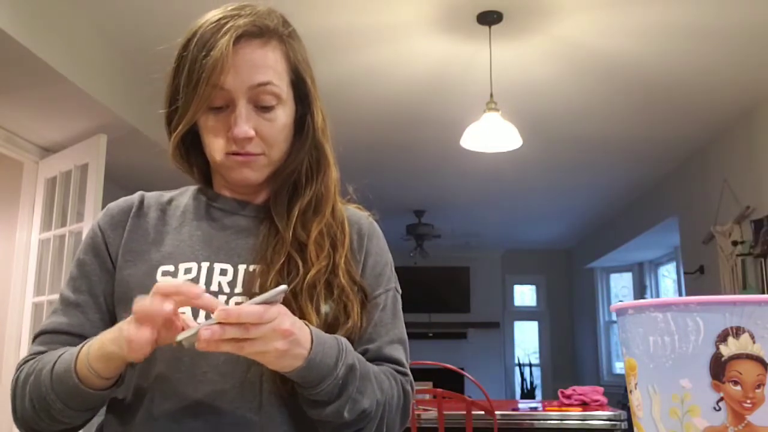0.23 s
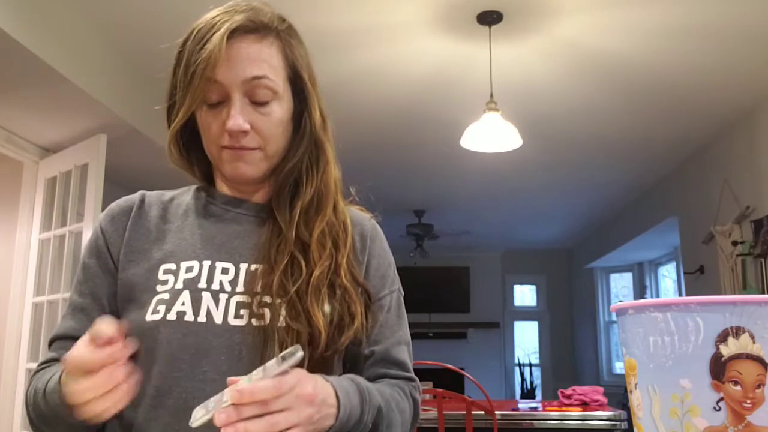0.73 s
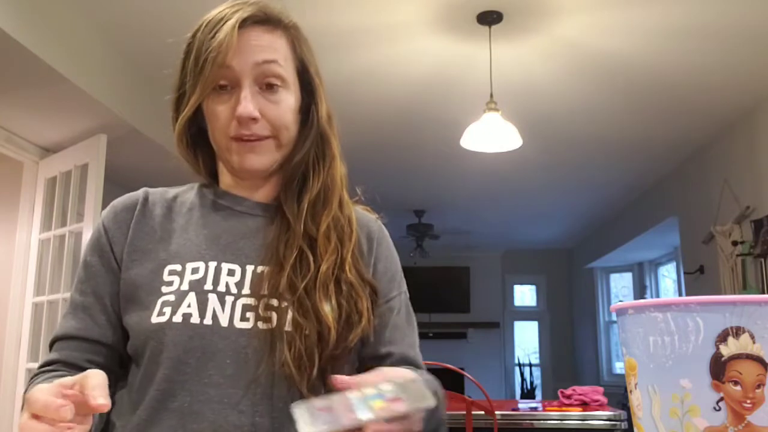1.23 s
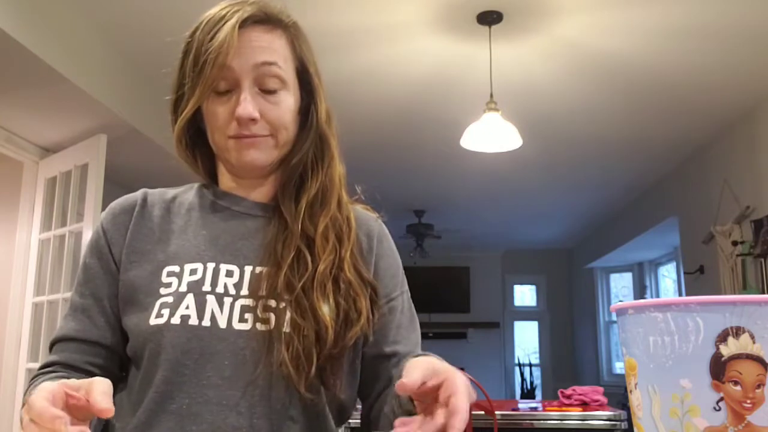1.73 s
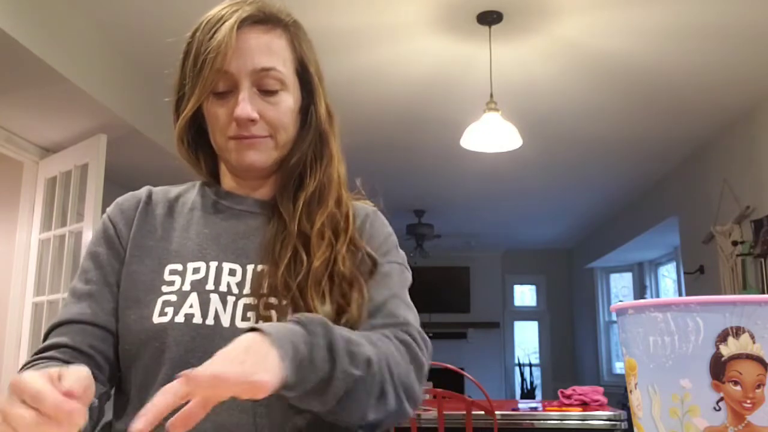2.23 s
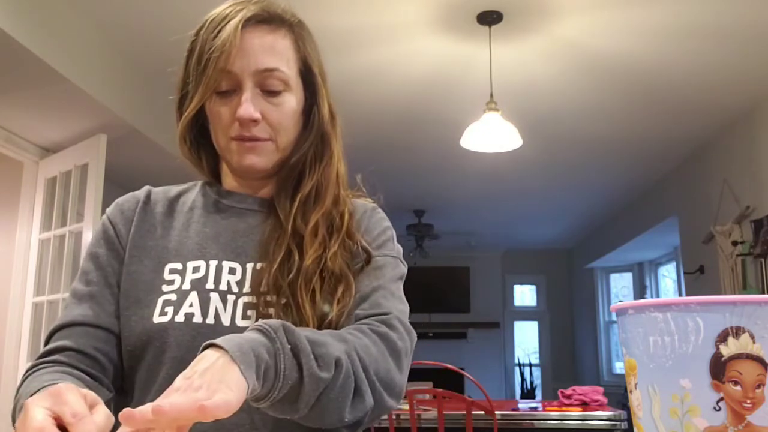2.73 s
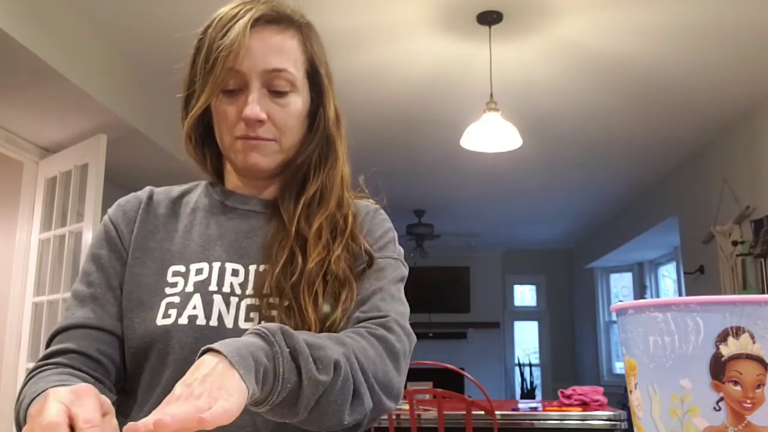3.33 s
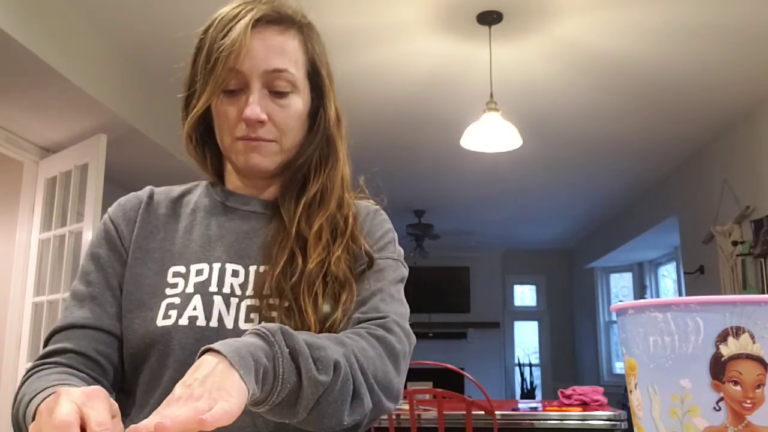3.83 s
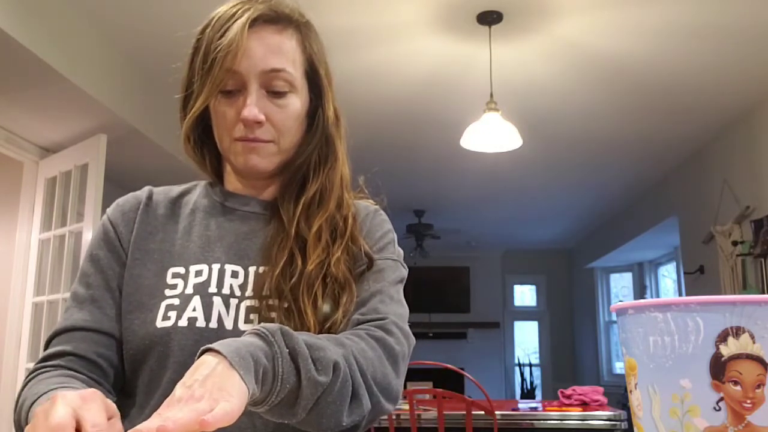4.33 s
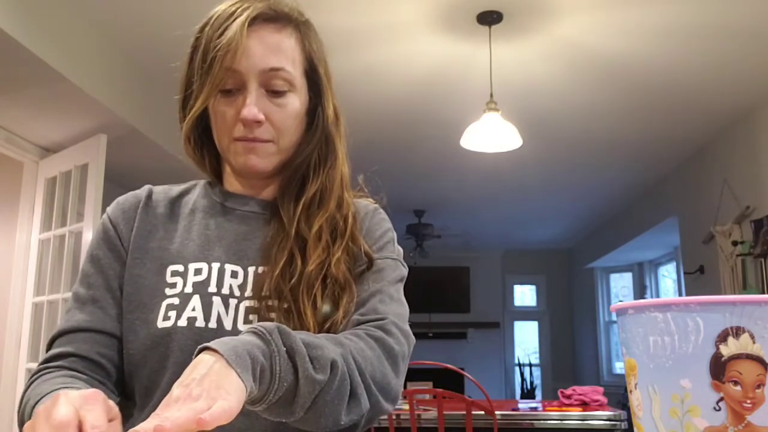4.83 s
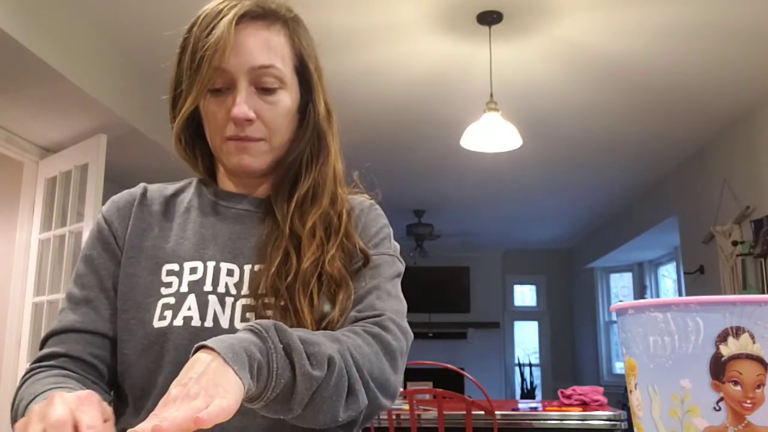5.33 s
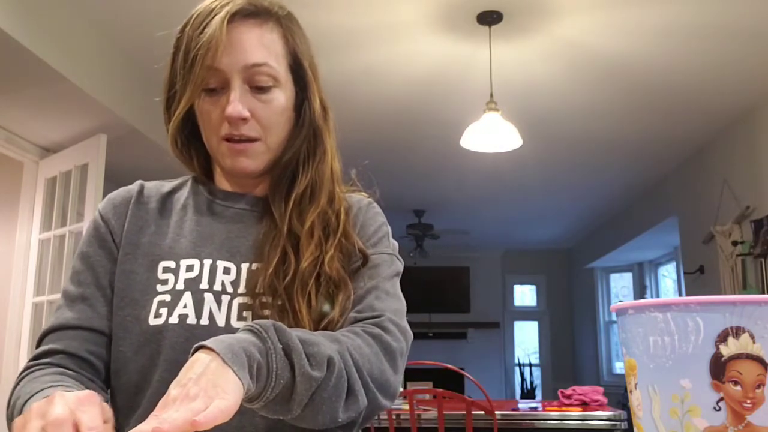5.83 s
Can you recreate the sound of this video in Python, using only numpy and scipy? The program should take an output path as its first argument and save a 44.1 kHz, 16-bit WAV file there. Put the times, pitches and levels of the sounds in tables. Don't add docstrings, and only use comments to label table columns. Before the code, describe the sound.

After faint ticks and a sleeve brush, hard plastic clacks and rattles on a table very close by, calms, then knocks again softly in a humming kitchen.

```python
import sys
import numpy as np
from scipy import signal
from scipy.fft import rfft, irfft, next_fast_len
from scipy.io import wavfile
from scipy.ndimage import uniform_filter1d, map_coordinates

SR = 44100
rng = np.random.default_rng(int(sys.argv[2]) if len(sys.argv) > 2 else 0)


def voltage_ratio(decibels):
    exponent = np.asarray(decibels, float) / 20
    return 10 ** exponent


def master_out(mix):
    frames = np.transpose(np.atleast_2d(mix))
    ceiling = np.clip(frames, -1, 1)
    pcm = np.round(ceiling * 32767).astype(np.int16)
    wavfile.write(sys.argv[1], SR, pcm)


N = 268613


def unit(x):
    return x / np.sqrt(np.mean(x ** 2) + 1e-20)


def along(points, hz):
    f, v = np.transpose(points)
    return np.interp(np.log(hz + 1), np.log(f + 1), v)


def wobble(rate):
    knots = rng.standard_normal(int(N * rate / SR) + 4)
    return map_coordinates(knots, [np.arange(N) * rate / SR])


def filtered(x, response):
    m = next_fast_len(x.shape[-1] + SR // 2)
    spectrum = rfft(x, m) * response(np.fft.rfftfreq(m, 1 / SR))
    return irfft(spectrum, m)[..., :x.shape[-1]]


def coloured(x, spectrum):
    return filtered(x, lambda hz: unit(voltage_ratio(along(spectrum, hz))))


def resonant(x, modes, order=1):
    def response(f):
        total = 0
        for k, (centre, width, db) in enumerate(modes):
            damping = 1j * f * width
            total = total + (-1) ** k * voltage_ratio(db) * damping / (centre * centre - f * f + damping)
        g = total ** order
        return g / np.sqrt(np.mean(abs(g) ** 2))
    return filtered(x, response)


def patchy(depth_db):
    z = signal.stft(rng.standard_normal((2, N)), nperseg=512)[2]
    field = uniform_filter1d(rng.standard_normal(z.shape[1:]), size=8, axis=0)
    field = uniform_filter1d(field, size=8, axis=1)
    return unit(signal.istft(z * voltage_ratio(depth_db * unit(field)), nperseg=512)[1][:, :N])


def strokes(rows, rise, fall):
    t = np.arange(0, N / SR + .001, .001)
    gain = 0
    for s, held, db in rows:
        early = np.clip(s - t, 0, None)
        late = np.clip(t - s - held, 0, None)
        gain = gain + voltage_ratio(db - rise * early - fall * late)
    return np.interp(np.arange(N) / SR, t, gain)


def ports(pair, alike, lean, lag_s):
    def response(hz):
        same = np.clip(along(alike, hz), 0, 1)
        half_lean = along(lean, hz) / 2
        far = voltage_ratio(-half_lean) * np.exp(-2j * np.pi * hz * lag_s)
        return np.array([voltage_ratio(half_lean), far * same, far * np.sqrt(1 - same ** 2)])
    left, shared, own = filtered(pair[[0, 0, 1]], response)
    return np.array([left, shared + own])


# (frequency [Hz], density [dB per Hz])
RUMBLE = [(15, -58), (25, -34.5), (98, -6), (139, -8.5), (206, -7), (224, -16), (280, -13.5), (388, -17),
          (493, -25.5), (595, -26), (1500, -46.5), (1950, -73.5), (3300, -120)]
# (frequency [Hz], width [Hz], level [dB])
MOTOR = [(131.23, 1.94, 3.5), (267, 30, -9.5)]
# (time [s], level [dB])
RUMBLE_DB = [(0.0, -67), (1.47, -65.5), (1.95, -55), (2.1, -65), (3.441, -67), (6.09, -64.5)]
# (frequency [Hz], density [dB per Hz])
HISS = [(900, -37.5), (1400, -6.5), (3000, -6.5), (6200, -11.5), (7400, -0.5), (8300, -10.5), (10500, -10),
        (12200, -3), (15700, -2)]
HISS_DB = -83
# (frequency [Hz], left-right likeness)
ROOM_ALIKE = [(60, 1), (180, 0.68), (550, 0.27), (1650, 0.36), (4970, 0.091), (15000, -0.14)]
# (frequency [Hz], left minus right [dB])
ROOM_LEAN = [(60, 7), (180, 5), (550, 4), (1650, 2.5), (4970, 7), (15000, 1.5)]


def room_tone():
    air = patchy(depth_db=1.7)
    drone = unit(resonant(rng.standard_normal((2, N)), MOTOR))
    rumble = unit(coloured(air, RUMBLE)) + voltage_ratio(-1.5) * drone
    level_db = np.interp(np.arange(N) / SR, *np.transpose(RUMBLE_DB))
    rumble *= voltage_ratio(level_db + 1.5 + 0.82 * wobble(3.6))
    hiss = voltage_ratio(HISS_DB + 7.5 + 1.4 * wobble(1.5)) * unit(coloured(air, HISS))
    return ports(rumble + hiss, ROOM_ALIKE, ROOM_LEAN, lag_s=0.00019)


# (start [s], held [s], level [dB])
CREAK = [
    (.5, 0.031, -67),
    (4.72, 0.32, -57.5),
    (4.93, 0.032, -77),
    (5.1, 0.076, -72),
    (5.85, 0.17, -65),
]
# (start [s], held [s], level [dB])
LEAN = [(.505, 0.019, -71.5), (.774, 0.0046, -70.5), (.985, 0.0054, -56), (1.29, 0.0082, -60.5),
        (1.34, 0.026, -58), (1.6, 0.055, -54), (1.92, 0.0045, -45), (2.17, .03, -59), (2.245, .02, -60),
        (2.36, 0.019, -63), (2.64, 0.327, -65), (4.46, 0.18, -66), (4.7, 0.06, -50), (4.88, 0.0043, -43),
        (5.06, 0.004, -63.5), (5.33, .15, -66), (5.79, 0.093, -67.5), (6.05, 0.044, -70.5)]
# (frequency [Hz], width [Hz], level [dB])
DRONE = [(780, 60, 0), (893, 70, -4), (685.5, 50, -5), (487, 97, -5.5), (1060, 150, -8)]
# (frequency [Hz], width [Hz], level [dB])
FRAME = [(81.5, 18, -5.5), (106, 34, 0), (124, 16, 5.5), (228, 260, 6), (440, 300, -9)]
LEAN_RISE, LEAN_FALL = 350, 360
RUB_RISE, RUB_FALL = 190, 163


def leaning():
    push = rng.standard_normal((2, N))
    hum = unit(voltage_ratio(3.5 * wobble(30)) * resonant(push, DRONE, order=2))
    creak = unit(resonant(push[::-1], FRAME, order=2))
    return strokes(LEAN, LEAN_RISE, LEAN_FALL) * hum + strokes(CREAK, RUB_RISE, RUB_FALL) * creak


# (time [s], peak level [dB], case pitch [Hz], plate ring [dB], treble [dB])
EARLY = [
    (0.7094, -67, 1480, -27, -20),
    (1.1314, -66.5, 2140, -20, -21),
    (1.2546, -63, 4240, -1.5, 11),
    (3.4294, -65, 3394, -28.5, 15.5),
    (3.4444, -71, 3180, -26, 13),
    (3.6097, -80, 4920, -11, 16),
]
SET_DOWN = [
    (1.5343, -22, 1970, -25, -13),
    (1.5422, -36.5, 2080, -9.5, -19.5),
    (1.575, -22, 2100, -19.5, -24),
    (1.5956, -27.5, 2040, -22.5, -40.5),
    (1.8359, -11.5, 1701, -20.5, -0.5),
    (1.848, -18.5, 2150, -25, 1.5),
    (1.874, -22, 2150, -14.5, 0),
    (1.9022, -20, 1694, -22, -5.5),
    (1.92, -26.5, 2940, -11.5, -12),
    (2.1021, -32, 3850, -6, -17.5),
]
SHUFFLE = [(1.766, -29, 1930, -20, -15.5), (2.0207, -41.5, 4000, -14, 8), (2.067, -28.5, 2350, -12, -14),
           (2.1639, -39, 2330, -16, 2.5), (2.5144, -37, 1760, -3.5, -1.4), (2.6375, -27, 2370, 2.5, -3.5),
           (2.6419, -27.5, 2480, 4, -20), (2.6606, -46, 2500, 10, -21), (2.6894, -20, 1870, -5.5, -12),
           (2.7353, -25.5, 3690, -16, -5.5), (2.76, -47.5, 4530, -10, 3), (2.8105, -48.5, 2340, 1, -15),
           (2.9112, -54.5, 2340, 8, 5.5), (3.0086, -63, 3230, -3.5, -4), (3.146, -48.5, 2335, -7, -1)]
CLICKS = [(2.152, -37, 2400, -10, -9.5), (2.3499, -35, 3850, -17.5, -4.5), (2.368, -30.5, 1994, -27, -10.5),
          (2.4309, -21, 2960, -3, -9.5), (2.623, -38, 3670, -23.5, -15.5), (2.6973, -22, 2580, 1.5, -8),
          (2.7147, -34.5, 2290, 3, -8), (2.787, -31, 2190, -10, -33.5), (2.8603, -36.5, 3730, -12.5, -2.5),
          (2.9458, -47.5, 2330, -9, 0), (2.9842, -47, 1410, 0, -4), (4.9694, -49.5, 4460, -6, -6),
          (5.4335, -55, 2240, -14, 0.5), (5.7597, -51.5, 1610, -14.5, -32)]
LATE = [
    (4.4523, -51.5, 2690, -6, -2),
    (4.7104, -44.5, 4100, -1, -8),
    (4.7551, -45, 2900, -7, -1),
    (4.7716, -45, 2820, -6, 0.5),
    (4.8621, -27.5, 3250, -4, -18),
    (4.91, -55.5, 1490, -20, 7),
    (5.2594, -69, 1700, 6.5, 4),
    (5.4174, -56, 2230, -21, 6),
]
DROPS = [
    (1.7495, -17, 2150, -9, -13.5),
    (1.9949, -22, 3397, -16, -3),
    (2.5075, -35.5, 2280, 0, 0),
]
AT_RIM = [
    (2.0853, -19, 3620, -5.5, -5),
    (2.406, -9, 2760, -11.5, -16.5),
    (2.4216, -33, 2500, -8, -14),
    (4.6528, -40, 2670, -7.5, -2),
    (4.6922, -49, 2930, 2, -13),
    (4.8499, -21, 4820, -1, -13.5),
]
THUMP_DB = {"tick": -22, "palette": -20.5, "flat": -6, "edge": -22.5, "nudge": -4.5, "drop": -5.5, "rim":
            -20}
THUMP_GROWS, MIDDLING_DB = 0.98, -34
# (pitch ratio, level [dB], t60 [s])
CASE = [(1.001, 0.5, 0.094), (1.19, -14.5, 0.021), (1.518, -17, 0.014), (1.901, -5, .012),
        (.72, 15, 0.0073), (2.598, -10.5, 0.014)]
# (frequency [Hz], level [dB])
CRACK = [(700, -46.5), (1200, -1), (2200, -4.5), (3200, -4.5), (4500, -3.5), (7000, -14), (10000, -26)]
# (frequency [Hz], level [dB])
SPARK = [
    [(3500, -39), (5000, -10), (7200, 1.5), (9500, -2), (12000, 0), (15500, 1)],
    [(1800, -29.5), (3500, -9.5), (5000, -0.5), (7200, 0.5), (9500, -9.5), (12000, -9), (15500, -15)],
]
# (frequency [Hz], width [Hz], level [dB])
TRAY = [(266.6, 10, -1), (492, 15, -3), (689, 27, 0.5), (958, 50, 0.5), (1080, 180, -10)]
# (frequency [Hz], width [Hz], level [dB])
TOP = [(748, 100, 11), (668.4, 16, 2.5), (736, 26, 3), (740, 44, -6), (930, 25, 0), (930, 23, 5),
       (960, 140, 1.5), (403, 76, -17)]
# (frequency [Hz], width [Hz], level [dB])
RIM = [(839, 60, 1.5), (870, 25, -15), (737, 36, -10), (460, 74, -22), (1040, 60, -14.5), (1410, 100, -19)]


def contacts():
    crack, case, frame, tray, top, rim, hard, soft = np.zeros((8, 2, N + SR))
    t = np.arange(SR // 9) / SR
    # (plate struck, edge, give [s], share of ring time)
    in_hand = (tray, hard, .000005, 1)
    on_top = (top, soft, .00002, .55)
    on_rim = (rim, soft, .00002, .55)
    kinds = [("tick", EARLY, in_hand), ("palette", SET_DOWN, in_hand), ("flat", SHUFFLE, on_top),
             ("edge", CLICKS, on_top), ("nudge", LATE, on_rim), ("drop", DROPS, on_rim), ("rim", AT_RIM, on_rim)]
    for kind, events, (plate, spark, give_s, ring) in kinds:
        for s, db, hz, ring_db, treble_db in events:
            thump_db = MIDDLING_DB + THUMP_DB[kind] + THUMP_GROWS * (db - MIDDLING_DB)
            at = slice(round(s * SR), round(s * SR) + len(t))
            noise = rng.standard_normal((4, 2, len(t)))
            draw = rng.standard_normal((len(CASE), 2, 2, 1))
            gentle = np.clip(-12 - db, 1, 16)
            rise = 1 - np.exp(-t / (give_s * gentle))
            peak = signal.iirpeak(hz, 0.046 + 0.12 * gentle, SR)
            body = unit(signal.lfilter(*peak, signal.lfilter(*peak, noise[0])))

            crack_fall = voltage_ratio(-60 * t / 0.018) + voltage_ratio(-29.5 - 60 * t / 0.13)
            crack[:, at] += voltage_ratio(db - 9.5) * rise * crack_fall * body
            spark_fall = voltage_ratio(-60 * t / 0.011) + voltage_ratio(-28 - 60 * t / 0.13)
            spark[:, at] += voltage_ratio(db + treble_db + 2.5) * rise * spark_fall * noise[1]

            for (ratio, level_db, t60), (size, detune) in zip(CASE, draw):
                pitch = hz * ratio * (1 + 0.018 * detune[0])
                mode_db = db - 17.5 - 0.05 * gentle + level_db + 3.5 * size
                case[:, at] += voltage_ratio(mode_db - 60 * t / (ring * t60)) * rise * np.sin(2 * np.pi * pitch * t)

            plate[:, at] += voltage_ratio(db + ring_db + 8.0 - 60 * t / 0.0038) * (0.55 * noise[2] - 1)
            frame[:, at] += voltage_ratio(thump_db - 0.5 - 60 * t / 0.0023) * (2.0 * noise[3] - 1)

    edges = coloured(hard[:, :N], SPARK[0]) + coloured(soft[:, :N], SPARK[1])
    plastic = coloured(crack[:, :N], CRACK) + edges + case[:, :N]
    table = resonant(top[:, :N], TOP) + resonant(rim[:, :N], RIM) + resonant(frame[:, :N], FRAME)
    return plastic + voltage_ratio(3.0) * resonant(tray[:, :N], TRAY) + table


# (frequency [Hz], t60 [s])
KITCHEN = [(150, 0.32), (800, 0.45), (3000, .35), (8000, 0.083), (15000, 0.053)]


def kitchen(x):
    hz, t, z = signal.stft(rng.standard_normal((2, SR // 2)), SR, nperseg=256)
    fall = voltage_ratio(-60 * t / along(KITCHEN, hz)[:, None])
    tail = signal.istft(z * fall, SR, nperseg=256)[1]
    delayed = np.pad(x, (250, 0))[None]
    return signal.fftconvolve(delayed, tail / np.linalg.norm(tail[0]), axes=1)[:, :N]


# (start [s], held [s], level [dB])
SWISH = [
    (0.829, 0.15, -52.5),
    (1.265, 0.072, -65.5),
]
# (frequency [Hz], density [dB per Hz])
CLOTH = [
    [(590, -31), (1000, -12), (1150, -26), (1410, -3.5), (1610, -3), (2170, -4.5), (3140, -13.5),
     (4240, -4), (5990, -7.5), (7550, -2), (8570, -6), (12000, -4), (15800, -6)],
    [(590, -34), (1000, -13), (1700, -24), (2190, -1.5), (3140, -16), (3820, 4.5), (5040, -6), (5790, -3),
     (6350, -12), (7810, -8.5), (9510, -16), (12700, -14), (15800, -24)],
]
SWISH_RISE, SWISH_FALL = 330, 211


def sleeves():
    n = 2 * SR
    flutter = voltage_ratio(.6 * wobble(30) + 1.2 * wobble(670))
    fibres = (flutter * patchy(depth_db=1.2))[:, :n]
    brush = np.zeros((2, n))
    for row, colour in zip(SWISH, CLOTH):
        brush += strokes([row], SWISH_RISE, SWISH_FALL)[:n] * unit(coloured(fibres, colour))
    return np.pad(brush, ((0, 0), (0, N - n)))


# (start [s], held [s], level [dB], fall [dB/s])
CHATTER = [
    (1.541, .015, -42.5, 299.5),
    (1.58, 0.035, -51, 140.5),
    (1.757, .015, -48.5, 219.5),
    (1.857, 0.02, -29, 230),
]
TRAY_HUM = (1.8, 0.19, -42, 300)
# (frequency [Hz], width [Hz], level [dB])
PANS = [
    [(1100, 90, -13.5), (1490, 140, -2.5), (2120, 69, -12.5), (2540, 400, -8), (2940, 250, -9.5),
     (3852, 30, -28)],
    [(1964, 35, -10), (2150, 150, -1), (2950, 240, -4.5), (3820, 98, 0), (3750, 26, 0), (4477, 27.4, -4),
     (4530, 37, -8), (4930, 20, -9.5), (5970, 94, -13.5), (6683, 150, -19.5)],
    [(1311, 200, -6), (2150, 250, 1), (3500, 404, -4.5), (5220, 600, -6)],
]
# (frequency [Hz], width [Hz], level [dB])
SHELL = [
    [(2000, 720, -3)],
    [(3180, 4000, -12)],
    [(3500, 5000, 0)],
]
WHICH_PANS = (0, 0, 2, 1)
CHATTER_RISE = 3500


def pans():
    n = 5 * SR // 2
    clumps = voltage_ratio(2.6 * wobble(160) + 4.6 * wobble(700))
    knocks = (clumps * rng.standard_normal((2, N)))[:, SR:n]
    colours = [unit(resonant(knocks, modes) + resonant(knocks, shell)) for modes, shell in zip(PANS, SHELL)]
    bursts = [(burst, colours[k]) for burst, k in zip(CHATTER, WHICH_PANS)]
    bursts.append((TRAY_HUM, unit(resonant(knocks, TRAY[:3], order=2))))
    rattle = np.zeros_like(knocks)
    for (s, held, db, fall), colour in bursts:
        rattle += strokes([(s, held, db)], CHATTER_RISE, fall)[SR:n] * colour
    return np.pad(rattle, ((0, 0), (SR, N - n)))


# (start [s], held [s], level [dB], brightness [dB])
RUB = [(1.55, 0.011, -81, 11), (1.77, 0.043, -86, 8), (1.91, 0.021, -49, -11), (2.01, 0.039, -58.5, -1),
       (2.11, 0.061, -55.5, -9), (2.328, 0.045, -55.5, -6), (2.58, .04, -55.5, -3.5),
       (2.84, 0.029, -58, -5), (3.39, 0.31, -91, 9.5), (3.98, 0.12, -86.5, 3), (4.47, 0.034, -67, -3.5),
       (4.7, 0.17, -58, -9.5), (4.87, 0.079, -63.5, -5), (5.03, 0.22, -84, 18), (5.327, 0.074, -65.5, 1.5),
       (5.48, 0.13, -58, 4), (5.68, 0.029, -63.5, 7), (5.79, 0.12, -61, 3.5), (5.98, 0.15, -71, 8)]
# (frequency [Hz], density [dB per Hz])
SKIN = [(590, -39.5), (1000, 1), (1150, -5.5), (1580, 0.5), (1770, -3.5), (2200, -1.5), (3150, -6),
        (3570, -3), (4970, -0.5), (8500, -7), (11000, -36.5), (18700, -120)]
# (frequency [Hz], density [dB per Hz])
SHEEN = [(4410, -38), (7500, -3), (8110, -9), (10800, -2.5), (11700, -1.5), (15100, -1), (15800, -17)]
# (start [s], held [s], level [dB])
SING = [
    (2.966, 0.013, -59),
    (4.455, .19, -75.5),
    (4.68, .11, -66),
]
# (frequency [Hz], width [Hz], level [dB])
LID = [(2881, 160, 0)]
SING_RISE, SING_FALL = 810, 510


def rubbing():
    grip = voltage_ratio(.3 * wobble(30) + .6 * wobble(150) + 2.2 * wobble(700))
    dull = [(s, held, db) for s, held, db, bright_db in RUB]
    skin = strokes(dull, RUB_RISE, RUB_FALL) * unit(grip * coloured(patchy(depth_db=1.5), SKIN))
    bright = [(s, held, db + bright_db - 0.5) for s, held, db, bright_db in RUB]
    sheen = strokes(bright, RUB_RISE, RUB_FALL) * unit(grip * coloured(patchy(depth_db=-1.5), SHEEN))
    song = unit(grip * resonant(rng.standard_normal((2, N)), LID, order=2))
    return skin + sheen + strokes(SING, SING_RISE, SING_FALL) * song


# (start [s], held [s], level [dB], centre [Hz], sharpness)
SCUFF = [(2.1, 0.0093, -52, 4460, 0.66), (2.15, 0.025, -51.5, 5030, 0.62), (2.208, .004, -59, 3700, 0.88),
         (2.3, 0.016, -55.5, 3680, 1.5), (2.31, 0.016, -51, 6000, 1.1), (2.343, 0.0082, -42, 4230, 1.8),
         (2.393, 0.004, -51, 6500, 2.5), (2.624, 0.012, -43.5, 4180, 1.2), (2.685, .004, -44.5, 3500, 2.1),
         (2.715, 0.0037, -49, 7500, 3.5), (2.761, 0.0073, -43, 9000, 0.59),
         (2.792, .005, -45.5, 7000, 0.51), (2.74, 0.025, -51.5, 4000, .8), (2.813, .004, -59, 7500, 2),
         (2.85, 0.014, -42, 3470, 1.12), (2.451, .03, -58, 3500, 0.57), (2.55, 0.064, -55.5, 4400, 0.84),
         (4.49, 0.039, -67.5, 5700, 1.7), (4.786, 0.048, -65.5, 6230, 8), (4.905, 0.0091, -60, 7000, 1.5)]
SCUFF_RISE, SCUFF_FALL = 2700, 1000


def scuffs():
    out = np.zeros((2, N))
    lead = SR // 25
    for s, held, db, hz, sharp in SCUFF:
        at = slice(round(s * SR) - lead, round(s * SR) + SR // 6)
        gain = strokes([(s, held, db)], SCUFF_RISE, SCUFF_FALL)[at]
        noise = rng.standard_normal((3, len(gain)))
        grit = voltage_ratio(6 * unit(uniform_filter1d(noise[2], size=60))) * noise[:2]
        peak = signal.iirpeak(hz, max(sharp, .4), SR)
        out[:, at] += gain * unit(signal.lfilter(*peak, signal.lfilter(*peak, grit)))
    return out


# (frequency [Hz], level [dB])
LOW_CUT = [(25, -20), (40, -8), (70, -0.5)]
# (frequency [Hz], left minus right [dB])
NEAR_LEAN = [(40, 13), (125, 9.5), (300, 8.5), (700, 8.5), (1400, 11), (2800, 10.5), (5600, 10),
             (9000, 4.5), (14000, 5.5)]
# (frequency [Hz], level [dB])
AIRBORNE = [(100, 8), (500, 0), (1500, -3.5), (15000, 4.5)]
LAG_S = 0.0004584


def scene():
    room = room_tone()
    hits = filtered(contacts(), lambda hz: voltage_ratio(along(LOW_CUT, hz))) + pans()
    handling = hits + leaning() + sleeves() + rubbing() + scuffs()
    near_alike = [(200, 0.96), (1000, 0.93), (3000, 0.27), (12000, 0.06)]  # (frequency [Hz], likeness)
    near = ports(handling, near_alike, NEAR_LEAN, LAG_S)
    answer = voltage_ratio([[3.5], [-3.5]]) * kitchen(coloured(hits[0], AIRBORNE))
    return near + voltage_ratio(-9.5) * answer + room


def low_pass(x):
    return signal.sosfilt(signal.butter(12, 16870, fs=SR, output="sos"), x)


def record(dry):
    rounded = dry / (1 + abs(dry / .9) ** 4) ** .25
    top_hz = 15800
    shelf = [(top_hz, 0), (top_hz + 150, -28), (top_hz + 1000, -38), (top_hz + 1100, -120)]
    mix = filtered(rounded, lambda hz: voltage_ratio(along(shelf, hz)))
    return low_pass(mix)


dry = scene()
out = record(dry)
master_out(out)
```